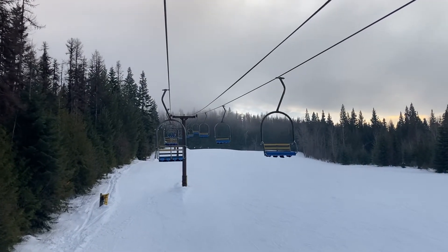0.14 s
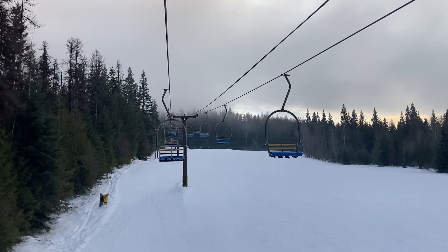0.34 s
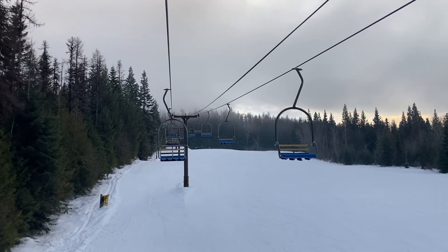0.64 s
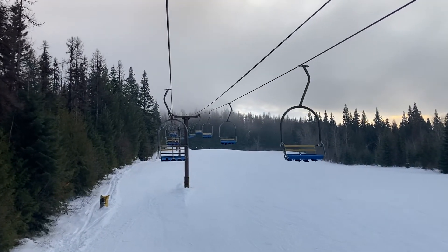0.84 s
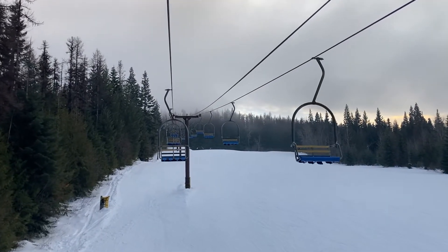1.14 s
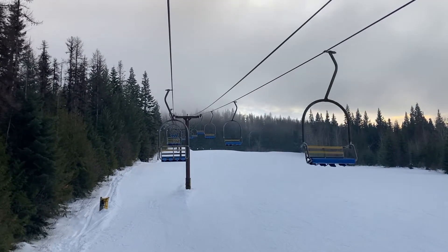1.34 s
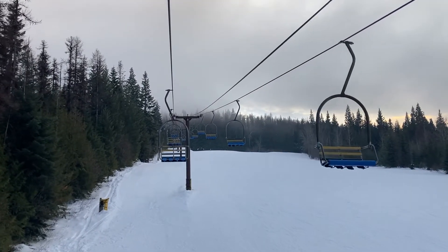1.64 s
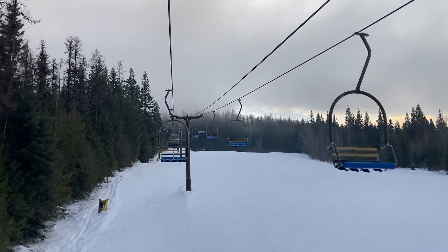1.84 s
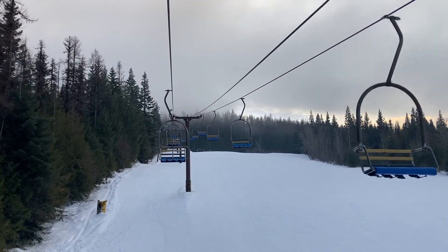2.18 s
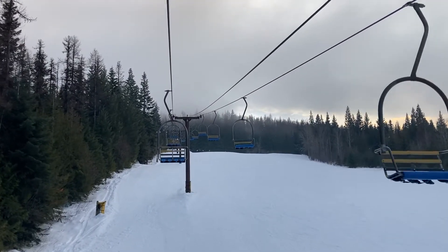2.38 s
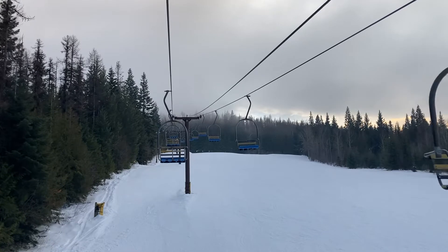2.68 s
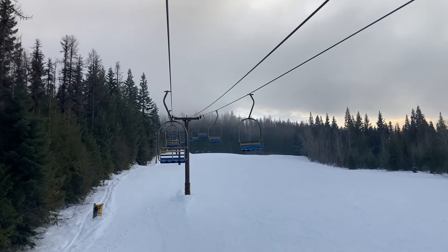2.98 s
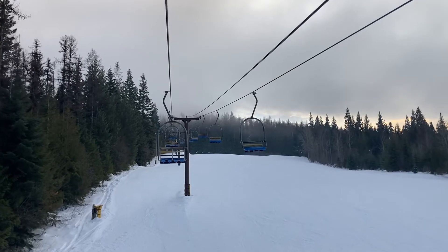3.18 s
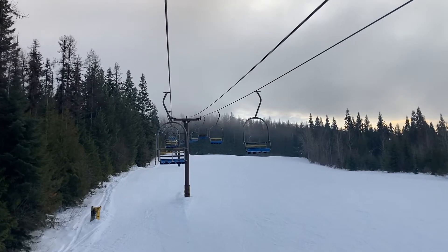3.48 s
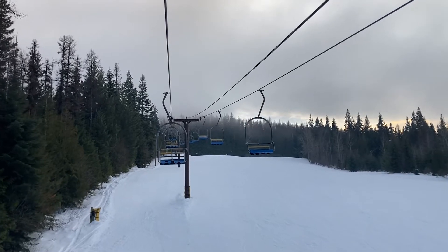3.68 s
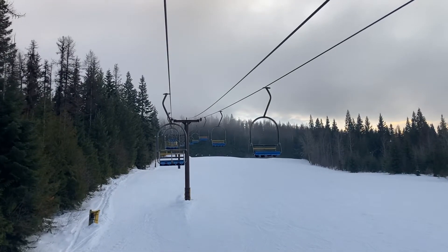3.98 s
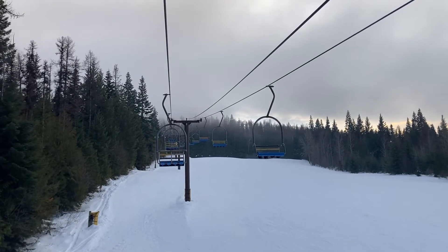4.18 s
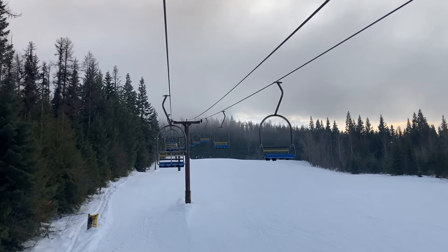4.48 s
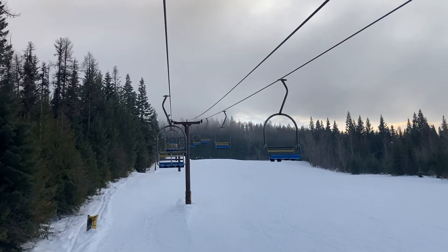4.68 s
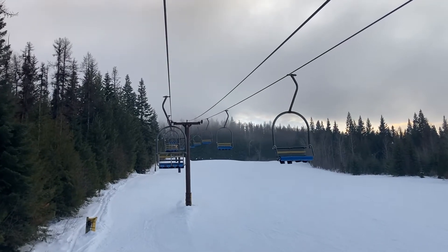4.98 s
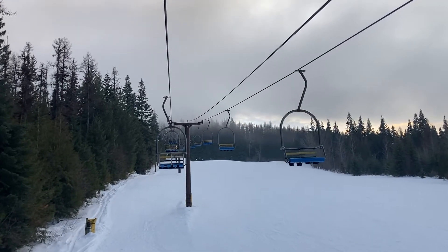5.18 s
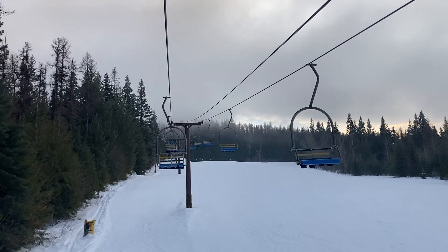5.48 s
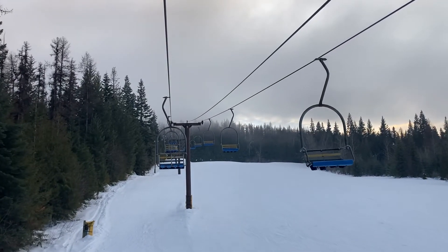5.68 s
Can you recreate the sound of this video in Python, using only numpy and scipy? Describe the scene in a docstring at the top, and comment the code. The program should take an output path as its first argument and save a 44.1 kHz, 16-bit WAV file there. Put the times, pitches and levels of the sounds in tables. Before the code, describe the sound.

Low wind flutter and soft cable rumble while an empty chairlift chair clatters past with metallic knocks and ringing, then brief scrapes on the rider's seat.

```python
"""A chairlift over a quiet snow slope: wind buffets the microphone, the rope rumbles through the hanger.
Wind and rope are coloured noise, the wind with single low swirls added; faint noise makes the air.
An empty chair comes from ahead on the right and passes: noise bursts clack, chatter, and tubing rings.
Near the end the rider's seat is scraped in two bouts, built from many tiny random slips."""
import sys
import numpy as np
from scipy import signal
from scipy.fft import rfft, irfft, next_fast_len
from scipy.io import wavfile
from scipy.ndimage import uniform_filter1d, map_coordinates

SR = 44100
rng = np.random.default_rng(int(sys.argv[2]) if len(sys.argv) > 2 else 0)


def unload_audio(sound):
    """Save the sound as a 16-bit wav file, at the path given as the first command line argument."""
    columns = np.transpose(np.atleast_2d(sound))
    # keep every value between -1 and 1, then stretch to whole-number steps
    steps = np.round(np.clip(columns, -1, 1) * 32767)
    wavfile.write(sys.argv[1], SR, steps.astype(np.int16))


N = 257089
T = np.arange(N) / SR  # seconds

# Strongest eddies at the microphone. Each row: centre in seconds, level in dB, smaller swirls in dB re eddy.
BUFFETS = [(.09, -39, -16), (.175, -39, -16), (2.78, -39.5, -16), (2.949, -39, -13), (3.028, -32, -14),
           (3.151, -28, -17), (3.321, -31, -17), (3.378, -30, -10), (4.2, -41, -20), (4.64, -35, -19),
           (5.244, -37.5, -24), (5.431, -34, -17), (5.723, -33, -9)]
# Gusts over the breeze. Each row: start in seconds, length in seconds, level in dB.
GUSTS = [(.03, .22, -49), (.3, 2.6, -59), (3.05, .34, -46.5), (4.25, 1.6, -48)]
# Spectrum of the wind flutter. Each row: frequency in Hz, gain in dB.
WIND_SPECTRUM = [(20, -24.5), (32, -3), (42, 10.5), (65, 10), (100, 6), (140, -7.5), (220, -16), (500, -63)]
# Wind changing side. Each row: time in seconds, lead of the left port in radians.
LEFT_PORT_LEAD = [(4.0, -.5), (4.15, 2.2)]
BREEZE_DB, GUST_RISE_S, GUST_FALL_S = -58.5, .08, .01
EDDY_HZ = 59.8

# Rope rumble. Each row: time in seconds, mean level in dB.
ROPE_LEVEL = [(0, -59.5), (1.4, -61), (2.15, -58), (2.7, -61.5), (3.7, -65.5), (4.5, -63), (5.83, -62)]
# Hanger resonances heard in the rumble. Each row: frequency in Hz, gain in dB.
ROPE_SPECTRUM = [(70, -9), (130, -2.5), (185, 2), (235, -1.5), (295, 0.5), (370, -8), (500, -16),
                 (900, -28), (2000, -71.5)]
ROPE_WAVER_DB = 1.7  # rms

# Spectrum of the air. Each row: frequency in Hz, gain in dB.
AIR_SPECTRUM = [(500, 3), (1000, -2), (2500, -11.5), (3500, -28), (6000, -33), (11300, -29), (13000, -34)]

# Fine chatter between clacks. Each row: time in seconds, level in dB before CHATTER_GAIN_DB.
CHATTER_LEVEL = [(0.0, -73.5), (0.25, -85), (0.31, -68.5), (0.42, -75), (1.5, -81.5), (1.6, -75),
                 (1.75, -61.5), (1.9, -77), (2.05, -67), (3.5, -93), (3.86, -79), (4.5, -80.5), (4.8, -76),
                 (5.3, -92.5)]
# Spectrum of the chatter. Each row: frequency in Hz, gain in dB.
CHATTER_SPECTRUM = [(300, -9.5), (600, 5), (1200, -0.5), (2000, 0.5), (3000, -7), (3500, -6), (5500, -20),
                    (11000, -28)]
CHATTER_GAIN_DB = 4.5

# Loose parts striking the passing chair's frame, often in pairs. Each row: time in seconds, knock in dB,
# mid band in dB re knock, top band in dB re mid band, tubing ring in dB.
CLACKS = [(.162, -64.5, -4, -17, -71), (0.287, -71.5, 2.5, -15, -87), (0.309, -64.5, 3, -16, -89),
          (.330, -57.5, -3, -8, -82), (.355, -55.5, -4, -2.5, -65), (0.472, -67, -3, -9, -91),
          (.501, -61, -1, -9, -70), (.547, -58.5, -2, -11, -62), (0.956, -68, -3, -17, -77),
          (1.074, -63, -12.5, -24, -76), (1.268, -64.5, -17, -20, -76), (1.295, -54.5, -14, -15, -85),
          (1.345, -60.5, -2.5, -8, -66.5), (1.509, -62.5, -4.5, -3.5, -70.5),
          (1.621, -57.5, -5.5, 0.5, -65.5), (1.670, -53.5, -5.5, 5, -59.5), (1.718, -61, -2.5, 1, -64),
          (1.737, -53.5, -5, 6.5, -67), (1.811, -53, -5, 0.5, -68), (1.854, -64.5, -1, -3, -66),
          (1.961, -52.5, 0, -5.5, -62.5), (2.009, -54.5, 0.5, -8, -64), (2.060, -52, -5.5, -5, -62),
          (2.11, -58, 3.5, -13.5, -69), (2.158, -48.5, -2.5, -5, -60), (2.268, -54.5, -6.5, -7, -60),
          (2.354, -52.5, -2, -9.5, -62), (2.417, -54, -6.5, -5.5, -80), (2.470, -53.5, -4.5, -13.5, -58),
          (2.538, -58.5, -0.5, -13, -73), (2.590, -55, -8, -16.5, -65), (2.622, -52, -1.5, -16, -56),
          (2.727, -59.5, 1, -12, -59), (2.777, -55.5, -1, -20, -62.5), (2.972, -60.5, -1.5, -34, -66),
          (3.059, -52, -1.5, -10, -57.5), (3.075, -49, 2, -14.5, -59), (3.250, -56, -3, -2, -66),
          (3.265, -47, 3.5, -9.5, -55), (3.448, -58, 0, -15.5, -54.5), (3.543, -53.5, 5, -8.5, -54.5),
          (3.645, -63.5, -4.5, -24, -75), (3.976, -67.5, -4, -12, -71.5), (4.001, -61.5, 2, -21, -56),
          (4.046, -62, 0, -23, -65), (4.201, -57, -5, -9, -58), (4.306, -61, -4.5, -18, -80),
          (4.333, -61.5, -5.5, -11, -73), (4.358, -60, -7, -6.5, -66), (4.390, -62.5, -11, -17, -80),
          (4.563, -57, -10, -7, -64), (4.602, -63, -9, -18, -90), (4.628, -55.5, -6.5, -18, -79),
          (4.654, -55, -8, -17, -68), (4.76, -55, -6.5, -17, -71), (4.831, -56.5, -14, -16, -86),
          (4.853, -49.5, -20, -12.5, -76), (4.962, -59, -6.5, -16, -101), (5.162, -73.5, -14, -20, -100),
          (5.33, -59.5, -8, -12, -92)]
# Spectrum of a knock. Each row: frequency as a multiple of its pitch, gain in dB.
KNOCK_SPECTRUM = [(.1, -18), (.3, -23), (.55, -7.5), (.8, 3.5), (1, -1), (1.174, 3.5), (1.6, -48.5)]
# Spectrum of a clack's mid band. Each row: frequency in Hz, gain in dB.
MID_SPECTRUM = [(1900, -33.5), (2900, 5), (3700, 0), (4800, -0.5), (6500, -29)]
# Spectrum of a clack's top band. Each row: frequency in Hz, gain in dB.
TOP_SPECTRUM = [(3500, -14), (5500, 8), (7400, 5), (9000, -18.5), (10500, 1.5), (12000, -6.5), (13200, -22)]
# Pitch of the knocking part. Each row: time in seconds, pitch in Hz.
KNOCK_PITCH = [(0, 2227), (2.3, 1950), (3.1, 2313), (4.3, 2150), (4.9, 2545)]
# Ping on the knock's pitch. Each row: time in seconds, half its starting amplitude in dB re knock.
PING = [(4.5, 0.5), (4.76, -1), (4.85, 3.5), (4.96, 13.5), (5.3, 3)]
# Close, beating modes of steel tubing. Each row: nominal frequency in Hz, mean level in dB, nominal t60 in seconds.
TUBE_MODES = [(3360, -8, .68), (3414, -3, .42), (3472, -2, .25), (3529, 1, .26), (3618, -4, .23)]
# Fall of the ring from blow to blow as the chair goes by. Each row: time in seconds, pitch ratio.
RING_PITCH = [(2.6, 1.013), (3.1, 1.001), (4.2, .99)]
# Quickly damped resonances of the chair frame: each entry a frequency in Hz.
FRAME_HZ = [1036, 1395, 1738, 2034, 2308, 2746, 3083, 3954, 4178, 4560, 6650, 7225]
# Stereo balance of the passing chair. Each row: time in seconds, left minus right in dB.
BALANCE = [(0, -0.5), (3.27, 3.5), (3.45, -9), (4, -9.5), (4.2, -5)]
PING_DECAY_S = 0.0051
BODY_S, BODY_S_PER_M = .0036, .00032  # knock decay up close, and added smear per metre of distance
SPEED_M_S, GAP_M, LEVEL_S = 4.6, 4.4, 4.22  # closing speed, gap between ropes, moment of drawing level
HEADING_RAD, PORTS_S = .2, .00044  # microphone turned right of the line; travel time between its ports

# Scrape strokes on the seat. Each row: start in seconds, length in seconds, gain in dB.
SCRAPES = [(5.374, 0.031, -48), (5.45, 0.019, -56), (5.51, 0.077, -64), (5.57, 0.075, -72),
           (5.672, 0.0095, -46), (5.715, 0.014, -51), (5.754, 0.0024, -44), (5.796, 0.015, -48.5)]
# Spectrum of the scrape. Each row: frequency in Hz, gain in dB.
SCRAPE_SPECTRUM = [(240, -14), (450, -1.5), (700, 7), (1250, 0), (1650, 4), (2600, -0.5), (3100, 0),
                   (3550, 7.5), (4600, -0.5), (7500, -13.5), (10800, -23.5), (12200, -11.5), (13200, -35)]
SCRAPE_ATTACK_S, SCRAPE_RELEASE_S = 0.0085, 0.032

TOP_HZ = 13100


def undb(db):
    """Decibels to gain."""
    return 10 ** (np.asarray(db) / 20)


def curve(rows):
    """Join the (s, value) rows by straight lines in time."""
    return np.interp(T, *np.transpose(rows))


def unit(x):
    """Scale to rms 1."""
    return x / np.sqrt(np.mean(x ** 2))


def colour(x, points):
    """Minimum-phase filter through (Hz, dB) points, made by folding the cepstrum."""
    hz, db = np.transpose(points)
    size = 8192
    f = np.maximum(np.fft.rfftfreq(size, 1 / SR), 1)
    log_gain = np.interp(np.log(f), np.log(hz), np.log(undb(db)))
    cepstrum = irfft(log_gain)
    cepstrum[1:size // 2] *= 2
    cepstrum[size // 2 + 1:] = 0
    impulse = irfft(np.exp(rfft(cepstrum)))
    return signal.fftconvolve(x, impulse)[:len(x)]


def walk(rate_hz):
    """Slow smooth random drift of rms 1."""
    k = int(SR / rate_hz)
    held = np.repeat(rng.standard_normal(N // k + 1), k)
    smooth = uniform_filter1d(uniform_filter1d(held, k), k)
    return unit(smooth[:N])


def noise(points):
    """Coloured noise of rms 1."""
    return unit(colour(rng.standard_normal(N), points))


def apart(x):
    """Opposite signs left and right."""
    return np.array([x, -x])


def swells(rows, attack_s, release_s):
    """Envelope of (s, length s, dB) events that rise, hold and die away; their powers add."""
    power = 0
    for s, length_s, db in rows:
        early_s = np.maximum(s - T, 0)
        late_s = np.maximum(T - s - length_s, 0)
        power = power + (undb(db) * np.exp(-early_s / attack_s - late_s / release_s)) ** 2
    return np.sqrt(power)


def wind(eddy_s=0.011):
    """Turbulence at the microphone ports: low flutter, and single eddies a few cycles long."""
    strength = np.hypot(undb(BREEZE_DB), swells(GUSTS, GUST_RISE_S, GUST_FALL_S))
    analytic = signal.hilbert(noise(WIND_SPECTRUM), next_fast_len(N))[:N]
    flutter = analytic * strength * undb(1.6 * walk(9.4))
    for (s, db, small_db), turn in zip(BUFFETS, rng.random(len(BUFFETS))):
        near = np.abs(T - s) < 5 * eddy_s
        t = T[near] - s
        swirl = np.exp(2j * np.pi * (EDDY_HZ * t + turn))
        small = swirl ** 2 + .5 * swirl ** 3  # turning two and three times as fast
        envelope = undb(db) * np.exp(-.5 * (t / eddy_s) ** 2)
        flutter[near] += envelope * (swirl + undb(small_db) * small)
    return np.real(flutter * np.exp(.5j * apart(curve(LEFT_PORT_LEAD))))


def rope():
    """The running rope shakes the hanger, which booms in broad low resonances."""
    rumble = noise(ROPE_SPECTRUM) + undb(-12.0) * apart(noise(ROPE_SPECTRUM))
    return rumble * undb(curve(ROPE_LEVEL) + ROPE_WAVER_DB * walk(11))


def air():
    """Faint wide hush of slope and forest: independent noise left and right."""
    sides = np.array([noise(AIR_SPECTRUM), noise(AIR_SPECTRUM)])
    return sides * undb(-69.5 + 0.49 * walk(3.4))


def ahead(s):
    """Metres by which the other chair is still ahead; negative once past."""
    return SPEED_M_S * (LEVEL_S - s)


def from_chair(x):
    """Place a sound at the chair's bearing by the lag between ports and the stereo balance."""
    bearing_rad = np.arctan2(GAP_M, ahead(T))
    lag_s = PORTS_S * np.sin(bearing_rad - HEADING_RAD)
    left = map_coordinates(x, [(T - lag_s) * SR], order=3)
    gains = unit(undb(apart(curve(BALANCE)) / 2))
    return gains * np.array([left, x])


def frame(x, width_hz=55, boost_db=4):
    """The chair frame's resonances colour whatever shakes it."""
    ringing = sum(signal.lfilter(*signal.iirpeak(hz, hz / width_hz, SR), x) for hz in FRAME_HZ)
    return x + undb(boost_db) * ringing


def grains(rate_hz, spread_db, decay_s):
    """Tiny random slips, each a short noise burst, a few much stronger than the rest; rms 1."""
    strength = undb(spread_db * np.minimum(rng.exponential(size=N), 4))
    size = (rng.random(N) < rate_hz / SR) * strength
    power = signal.lfilter([1], [1, -np.exp(-2 / (decay_s * SR))], size ** 2)
    return unit(np.sqrt(power) * rng.standard_normal(N))


def chatter():
    """Small parts of the passing chair tremble in fits; part of that arrives from all sides."""
    ticks = unit(frame(colour(grains(rate_hz=130, spread_db=3.6, decay_s=.007), CHATTER_SPECTRUM)))
    diffuse = np.array([noise(CHATTER_SPECTRUM), noise(CHATTER_SPECTRUM)])
    fits_db = 1.8 * walk(20)
    level = undb(curve(CHATTER_LEVEL) + CHATTER_GAIN_DB + fits_db)
    return (from_chair(ticks) + undb(3.0) * diffuse) * level


def tube(t):
    """Decaying modes of steel tubing; every call varies their levels, tuning and phases a little."""
    hz, db, t60_s = np.transpose(TUBE_MODES)[:, :, None]
    size_db, detune, turn = rng.standard_normal((3, len(TUBE_MODES), 1))
    hz = hz * (1 + .002 * detune)
    decay = undb(db + 2 * size_db - 60 * t / t60_s)
    return np.sum(decay * np.sin(2 * np.pi * (hz * t + turn)), axis=0)


def blow(t, points, body_s, rebounds_s, attack_s=.0006, crack_s=.002,
         tail_per_body=5, tail_db=-18, rebound_db=-8):
    """A crack, the part's knock, ever weaker rebounds and a frame clatter; rms 1 over the first 14 ms."""
    rebounds = sum((t > s) * np.exp(-np.abs(t - s) / crack_s) / (k + 1)
                   for k, s in enumerate(rebounds_s))
    shape = np.exp(-t / crack_s) + np.exp(-t / body_s)
    shape = shape + undb(rebound_db) * rebounds
    shape = shape + undb(tail_db) * np.exp(-t / (tail_per_body * body_s))
    attack = 1 - np.exp(-t / attack_s)
    x = frame(colour(shape * attack * rng.standard_normal(len(t)), points))
    return x / np.sqrt(np.mean(x[t < .014] ** 2))


def passing_chair():
    """Loose parts knock on the frame and tubing rings on; distance smears each knock."""
    t, short = T[:SR // 2], T[:SR // 5]
    direct, scattered = np.zeros((2, N + len(t)))
    for s, db, mid_db, top_db, ring_db in CLACKS:
        i = int(s * SR)
        hz = np.interp(s, *np.transpose(KNOCK_PITCH))
        body_s = BODY_S + BODY_S_PER_M * np.hypot(GAP_M, ahead(s))
        rebounds_s = np.cumsum(rng.uniform(.005, .014, size=4))
        knock_spectrum = np.array(KNOCK_SPECTRUM) * [hz, 1]
        for path in (direct, scattered):
            low = blow(short, knock_spectrum, body_s, rebounds_s)
            mid = blow(short, MID_SPECTRUM, body_s, rebounds_s)
            top = blow(short, TOP_SPECTRUM, body_s, rebounds_s)
            path[i:i + len(short)] += undb(db) * (low + undb(mid_db) * (mid + undb(top_db) * top))
        ping_gain = 2 * undb(db + np.interp(s, *np.transpose(PING)))
        ping = ping_gain * np.exp(-t / PING_DECAY_S) * np.sin(2 * np.pi * hz * t)
        ring = undb(ring_db) * tube(t * np.interp(s, *np.transpose(RING_PITCH)))
        direct[i:i + len(t)] += ping + ring
    return from_chair(direct[:N]) + undb(-16) * apart(scattered[:N])


def crackle():
    """Slips of every size: each octave crackles at its own moments."""
    edges_hz = SR / 3 / 2. ** np.arange(7)
    total = 0
    for high, low in zip(edges_hz, edges_hz[1:]):
        octave = signal.butter(2, [low, high], "bandpass", fs=SR, output="sos")
        total = total + signal.sosfilt(octave, grains(rate_hz=380, spread_db=3.0, decay_s=.004))
    return total


def scrape(lag_ms=.09, pan_db=-3.5):
    """Slips on the seat run together into a crunch, which also sets tubing ringing."""
    slips = crackle()
    ring = unit(signal.fftconvolve(slips, tube(T[:SR // 2]))[:N])
    crunch = unit(frame(colour(slips, SCRAPE_SPECTRUM), boost_db=0))
    x = crunch + undb(-9.5) * ring
    late = np.roll(x, int(round(lag_ms * SR / 10 ** 3)))
    pair = np.array([x * undb(pan_db / 2), late * undb(-pan_db / 2)])
    wide = undb(-12.0) * apart(noise(SCRAPE_SPECTRUM))
    return (pair + wide) * swells(SCRAPES, SCRAPE_ATTACK_S, SCRAPE_RELEASE_S)


def scene():
    """Everything that reaches the rider."""
    return wind() + rope() + air() + chatter() + passing_chair() + scrape()


def record(dry):
    """The phone cuts the top: a steep low-pass at TOP_HZ."""
    return signal.sosfilt(signal.ellip(8, .2, 70, TOP_HZ, fs=SR, output="sos"), dry)


dry = scene()
out = record(dry)
unload_audio(out)
```